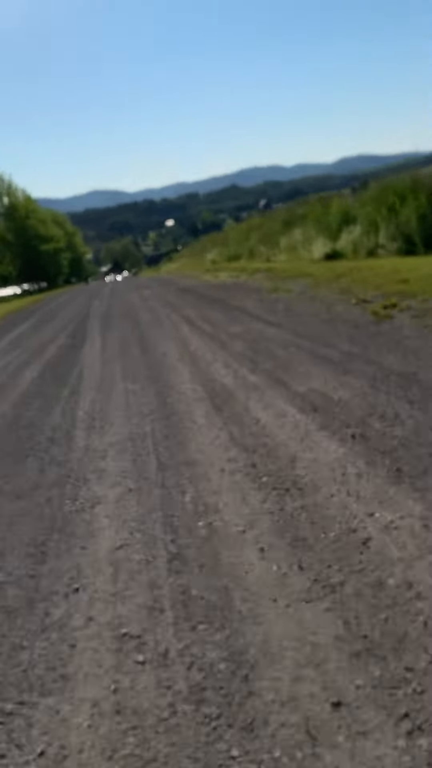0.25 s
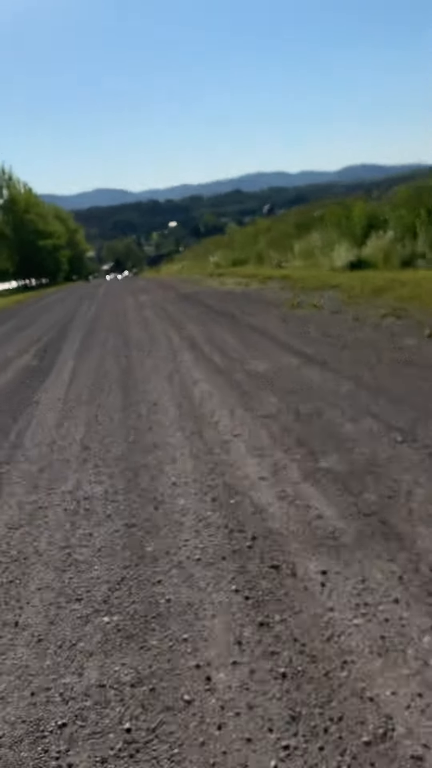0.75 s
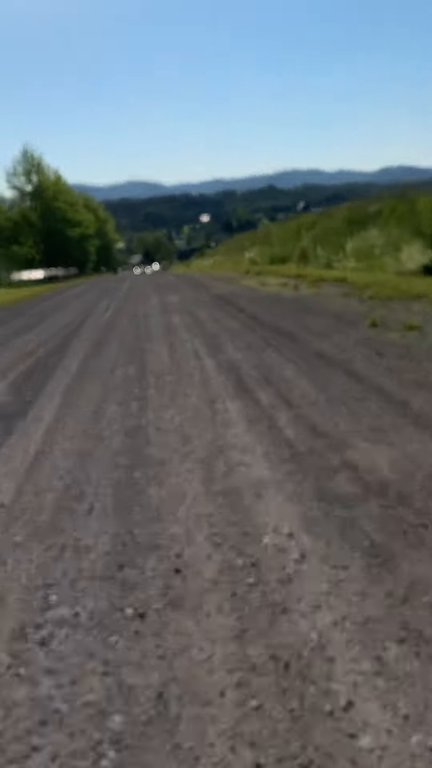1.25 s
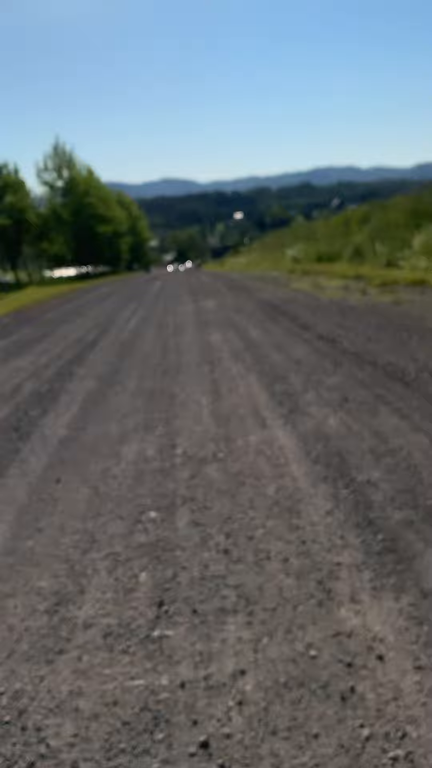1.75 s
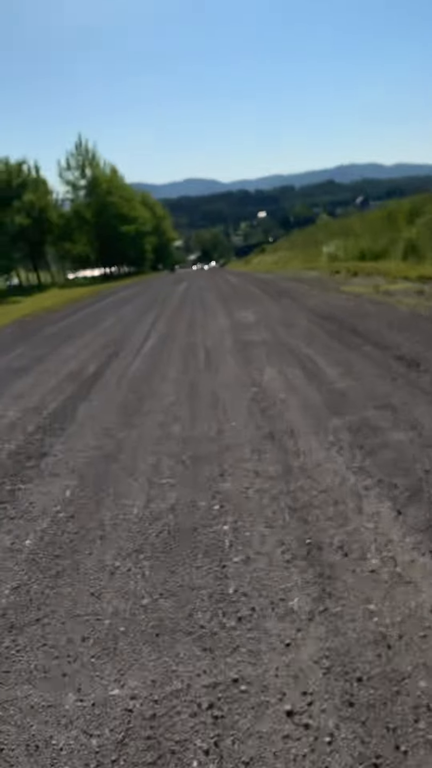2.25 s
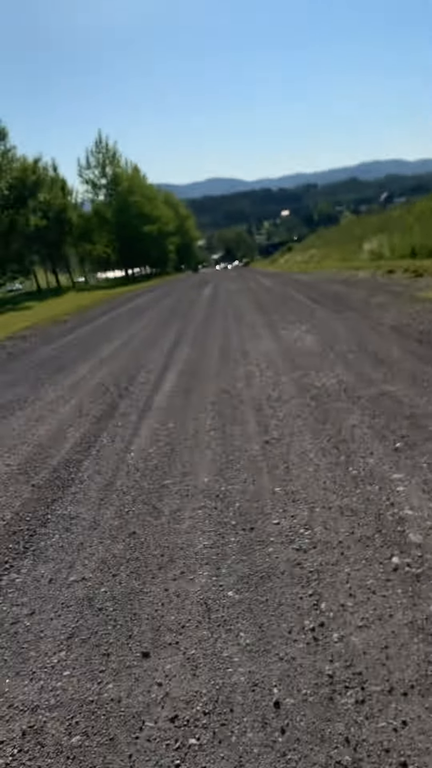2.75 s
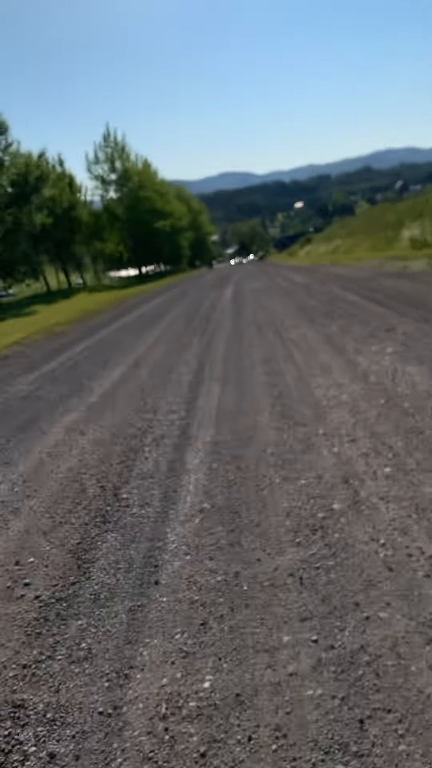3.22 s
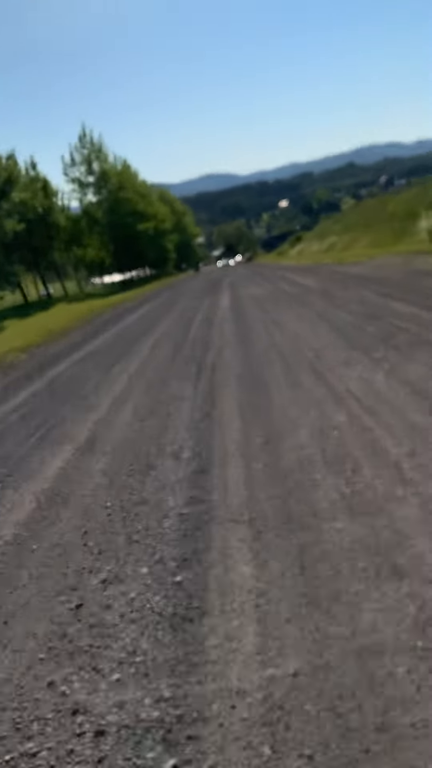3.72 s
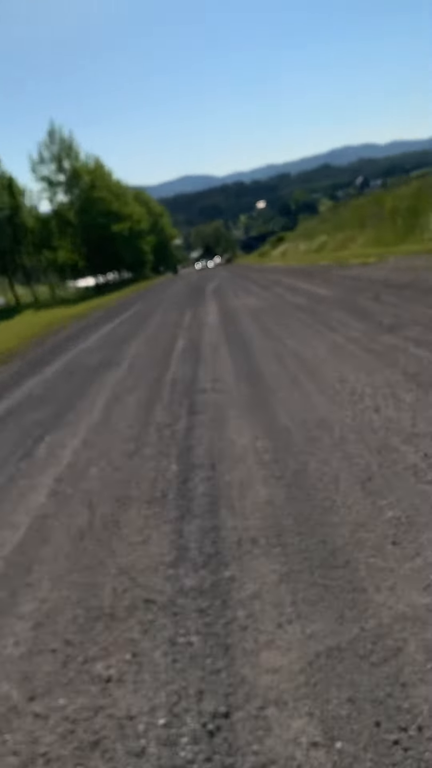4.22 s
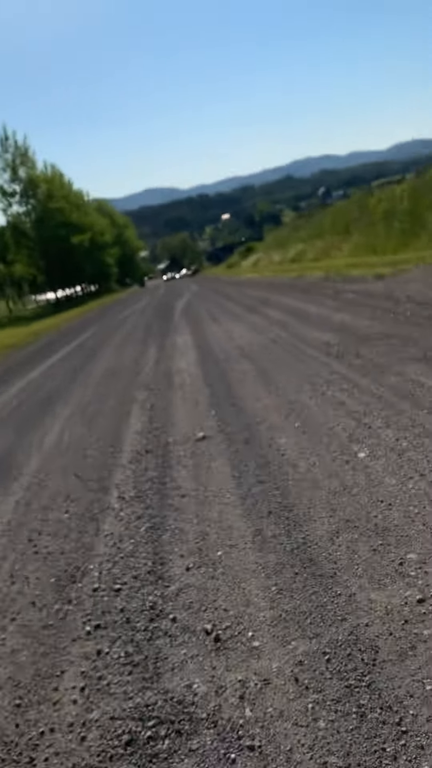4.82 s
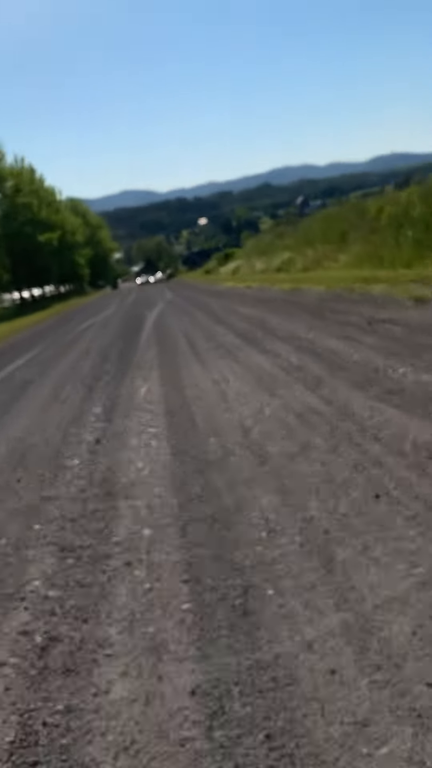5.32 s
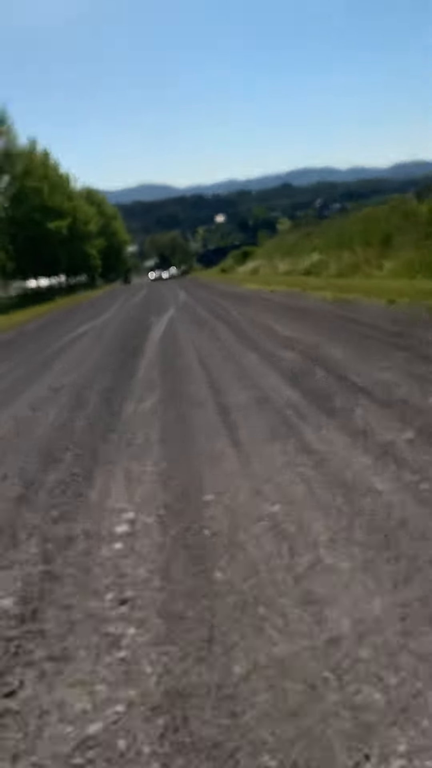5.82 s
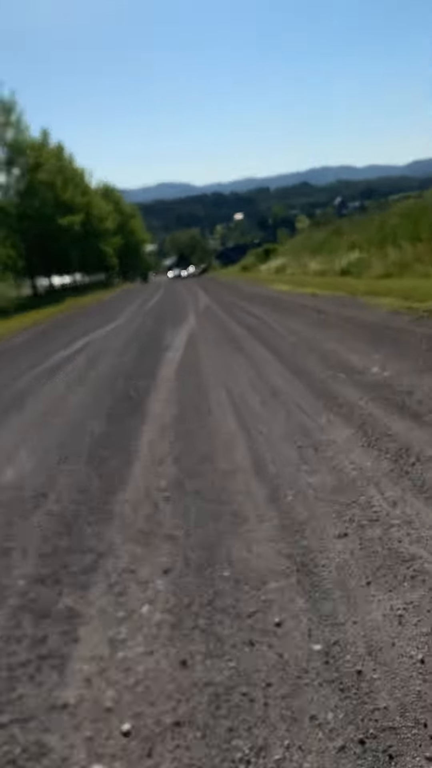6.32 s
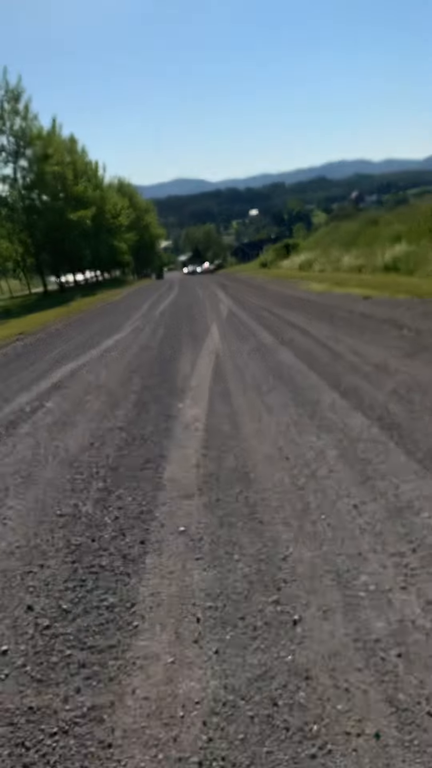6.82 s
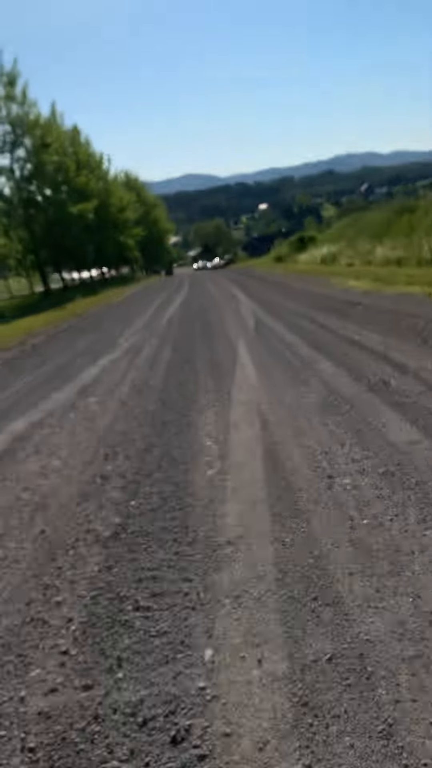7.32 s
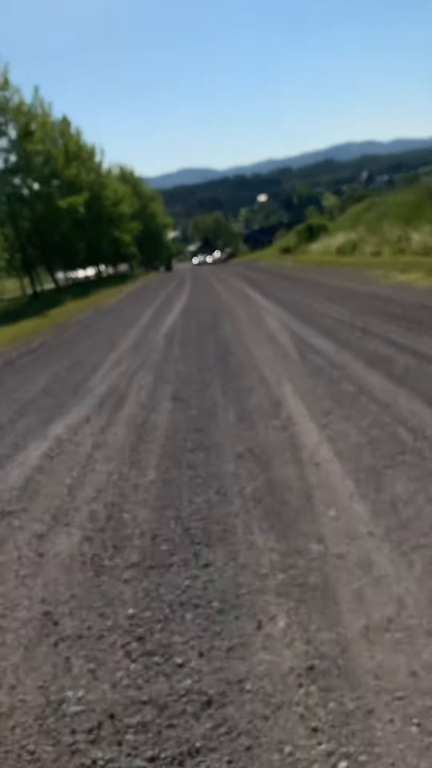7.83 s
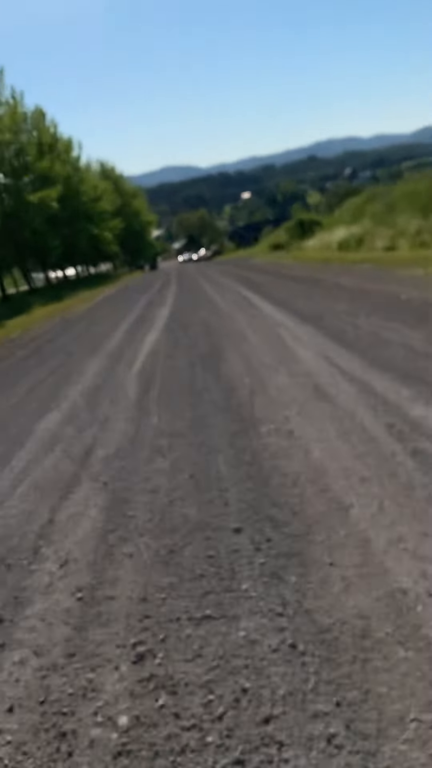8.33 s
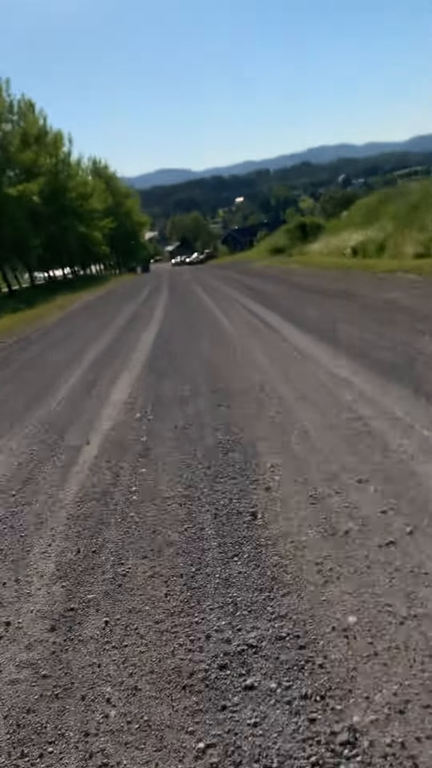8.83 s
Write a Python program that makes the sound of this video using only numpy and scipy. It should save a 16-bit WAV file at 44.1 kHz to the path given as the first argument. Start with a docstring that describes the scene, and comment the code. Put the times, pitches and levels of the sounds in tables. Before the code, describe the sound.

Continuous crunching of tyres on gravel, close and dry in the open air, with pebbles clicking, chips ticking and small stones clinking. The texture is uneven, briefly looser then firmer, and grows fuller as the bike gains speed. Isolated stones crack sharply from under the wheels. Beneath it, wind rumbles on a moving stereo microphone; after seven seconds heavy buffets mix with dull bumps of the tyre.

```python
"""Fine grit grinds under tyres over a low rumble of wind: a bicycle rolls down loose gravel, slowly speeding up.
Tread roar, crunch and fizz are dense random impacts; larger stones snap out with a crack and a hollow thock.
Pebbles, chips, clinks and thuds are short resonances, and turbulent wind is filtered noise with hard buffets.
A pair of microphone ports hears the bass as one and the treble a little apart, by phase shifts."""
import sys
import numpy as np
from scipy import signal
from scipy.fft import rfft, irfft, next_fast_len
from scipy.io import wavfile

SR = 44100
rng = np.random.default_rng(int(sys.argv[2]) if len(sys.argv) > 2 else 0)


def digitize_waveform(pressure):
    """Quantize a signal to 16-bit integers and store it at the path in sys.argv[1].

    Rows of a 2-D input are taken as channels; values are limited to [-1, 1].
    """
    field = np.atleast_2d(pressure).T
    bounded = np.clip(field, -1, 1)
    quanta = np.round(bounded * 32767).astype(np.int16)
    wavfile.write(sys.argv[1], SR, quanta)


N = 399546

# Looser and firmer ground. Each row: time in seconds, depth of loose gravel in dB.
GRAVEL_DEPTH = [(0.0, 4), (0.3, 4.5), (0.62, 10), (0.95, -1), (1.35, 0), (1.53, 0.5), (1.8, 1), (2.1, 5.5),
                (2.52, 0.5), (2.85, 2), (3.25, 1), (3.6, 3.5), (4.1, 4.5), (4.8, 4), (5.45, 5.5),
                (5.9, 5.5), (6.75, 4.5), (7.2, 1.5), (7.48, -4.5), (7.9, 1), (8.15, 6), (9.06, 5)]
# Each tyre layer: dB at the starting speed, dB more per doubling of speed, share of the gravel's depth it follows.
ROAR_LAW, CRUNCH_LAW, FIZZ_LAW = (-47.5, 19, 0.26), (-43, 6.8, 0.37), (-54, 1.3, 0.53)


def tyres():
    """Granular failure: tread roar, crunch and sand fizz surge together as clumps of gravel give way."""
    # Spectra of the three layers. Each row: frequency in Hz, relative level in dB.
    roar_spectrum = [(200, -26), (400, -6.5), (600, 3), (800, -1.5), (1050, 2), (1280, 4), (1480, -1),
                     (2200, -6), (5000, -22)]
    crunch_spectrum = [(700, -30), (1300, -2), (1900, -5), (2600, 0), (2950, -3), (3300, -1), (3650, -3.5),
                       (4000, -2.5), (5000, -5), (6000, -9), (7000, -14), (8500, -22), (10000, -31),
                       (16000, -60)]
    fizz_spectrum = [(3000, -20), (5500, -1), (6500, 0), (8000, 4), (9000, 4), (10200, 1.7), (11000, -2),
                     (15700, -1), (17000, -6)]
    clumps = wander(rate_hz=14.3)
    roar = grit(roar_spectrum, per_s=1800, spread_db=2.5, width_hz=250, count=6)
    crunch = grit(crunch_spectrum, per_s=3600, spread_db=2.5, width_hz=480, count=16)
    fizz = grit(fizz_spectrum, per_s=8000, spread_db=2.1, width_hz=750, count=14)
    roar = roar * level(ROAR_LAW, GRAVEL_DEPTH) * gain_of(2.0 * clumps)
    crunch = crunch * level(CRUNCH_LAW, GRAVEL_DEPTH) * gain_of(1.4 * clumps)
    fizz = fizz * level(FIZZ_LAW, GRAVEL_DEPTH) * gain_of(1.2 * clumps)
    return roar + crunch + fizz


def grit(spectrum, per_s, spread_db, width_hz, count=20):
    """Shot noise: tiny impacts excite one band per grain size, left and right of the wheels."""
    hz = np.fft.rfftfreq(1024, 1 / SR)
    out = np.zeros((2, N))
    for centre_hz in np.linspace(spectrum[0][0], spectrum[-2][0], count):
        bell = np.exp(-.5 * ((hz - centre_hz) / width_hz) ** 2)
        band = gain_of(read(spectrum, hz)) * bell
        clusters = patches()
        for direction in (-1, 1):
            grain = np.fft.fftshift(irfft(band * ports(hz, direction)), 1)
            impacts = clicks(per_s / count, spread_db) * clusters
            out += signal.oaconvolve(np.array([impacts, impacts]), grain, "same", axes=1)
    return evened(out)


def patches():
    """Amplitude modulation: a random gain that gives one size of grain its clusters and lulls."""
    patchy_db, patchy_hz = 1, 25.2
    knots = np.arange(0, N + SR, SR / patchy_hz)
    gains = gain_of(patchy_db * rng.standard_normal(len(knots)))
    return np.interp(np.arange(N), knots, gains)


def stones():
    """Stick and release: each large stone grates briefly as the tread loads it, then snaps free."""
    # Stones flicked by the tread. Each row: time in seconds, peak level in dB, crack in Hz, thock in Hz,
    # thock against the crack in dB, loose grit after it in dB, direction with 0 ahead.
    flicked = [(0.1935, -19, 2650, 804, -14, 1, 0.1), (0.3568, -18.5, 1790, 850, 0, 1, -0.88),
               (0.4356, -18, 3040.0, 900.0, -12, -1, 0.1), (0.66, -24, 2850, 1030, 6, -1, -0.014),
               (0.8139, -11.8, 3300, 1060, -14, -7, 0.064), (0.9165, -19, 2330, 930.0, -18, -4, 0.79),
               (1.0302, -4, 2860, 840.0, -14.5, -24, 0.064), (1.1085, -27, 1840.0, 1050.0, 0, -11.0, 0.1),
               (1.1871, -15.5, 1860, 950, 0.5, -8, -0.6), (1.2288, -15.5, 2250, 950.0, -2, -9, -0.59),
               (1.29, -19, 3430, 900, -20, -3, 0.1), (1.3441, -12.5, 3270, 760.0, -14, -12, 0.25),
               (1.407, -12.5, 2330.0, 930, 0.5, 0, -0.57), (1.623, -27, 2400, 1050, 4, 0, -0.16),
               (1.6551, -18.5, 2420.0, 1090, 3, -1, 0.009), (1.7104, -12.5, 2560, 600.0, -19, -7, -0.83),
               (1.7528, -22.5, 2350.0, 670.0, 14.0, -12, -0.0),
               (1.877, -21, 2980.0, 1050.0, -16, -1.0, 0.1), (1.893, -19, 2460.0, 700.0, -23, -9, 0.4),
               (1.993, -19, 2520, 910, -7, 2, -0.16), (2.095, -17, 2850, 830, -6, -6, -0.56),
               (2.106, -18, 2400, 840, 3, 1, -0.9), (2.1282, -17.5, 3430.0, 1030.0, -2.5, -11, 1),
               (2.298, -20.5, 2340, 900, -16, -5, -0.16), (2.315, -11, 2920, 900, -18, -2, -0.068),
               (2.3645, -23, 2400, 950, -1, -10, -0.21), (2.376, -22, 2630, 900, -20, -6, 0.45),
               (2.5123, -21, 2400.0, 910.0, 0, -6, -0.28), (2.584, -23.5, 2400, 1044, 7, -7, -0.2),
               (2.62, -24.5, 2580, 900, -8, -1, -0.3), (2.7512, -20.5, 1880.0, 930.0, -3, 4, -0.4),
               (2.7601, -22.5, 1940.0, 810.0, 0, 4.0, -0.2), (2.797, -21, 2360.0, 850.0, -3, -15, -0.6),
               (2.9689, -20.5, 2600.0, 970, 10, -10, -0.4), (2.993, -19, 2940, 850, -20, 4, 0.51),
               (2.982, -24, 2390, 900, -19, -4, 0.54), (3.019, -27, 2400, 1018, 13, -12, -0.4),
               (3.0546, -19.5, 2260.0, 880.0, 2, 10, -0.6), (3.3838, -16.5, 2150.0, 684, -8.5, -8, -0.33),
               (3.4005, -21.5, 2830.0, 1030, -2, 4, 0.18), (3.538, -19, 2800, 900, -20, -12, -0.095),
               (3.579, -15, 2440, 900, -15, -7, -0.13), (3.6327, -20, 2370.0, 900.0, -5.5, -2, -0.3),
               (3.9065, -17.5, 2520.0, 1030, 2, -6, -0.49), (3.9247, -12.5, 3100, 670.0, -20, -5, -0.2),
               (4.3303, -23.5, 2860.0, 960.0, 0, 9, -0.2), (4.758, -17.5, 2880.0, 603, -9.5, 0, 0.053),
               (4.843, -19, 3430.0, 1070, -2, 0, -0.064), (4.9623, -19, 3240.0, 960, 1, 14, 0.093),
               (5.0182, -20.1, 2780.0, 820.0, -22, -2, -0.1), (5.0438, -20, 2330.0, 840.0, -4, 0, -0.23),
               (5.1537, -14, 2980, 920.0, -14, -5, -0.088), (5.3019, -16.5, 3160.0, 870.0, -22, -3, 0.21),
               (5.3954, -18, 3400.0, 790.0, -13, -2, 0.24), (5.4604, -16.5, 3100, 980.0, -19, -3, -0.039),
               (5.688, -24, 2650, 900, -16, -8, -0.093), (5.816, -18.5, 3340.0, 980.0, -6, -3, 0.026),
               (5.8508, -19.5, 3040.0, 900.0, -20, 5, -0.28), (5.9869, -19.5, 2350.0, 935, 1, -5, -0.71),
               (5.999, -16, 3100, 900, -13, -3, 0.1), (6.088, -23, 3120.0, 1050.0, -5, 13, -0.022),
               (6.1604, -18, 2770.0, 930.0, 6, 9, -0.57), (6.274, -16.5, 2720, 960.0, -2.0, -3, -0.45),
               (6.3547, -18, 2270.0, 920.0, -0.0, -3, -0.53), (6.5907, -13.5, 2270, 820, 4.5, 8, -0.72),
               (6.7506, -13.5, 2930.0, 920, 7, -7, -0.67), (6.767, -17, 2570, 930.0, -27, 3, 0.42),
               (6.7905, -15, 2060, 730.0, -8, -4, -0.84), (6.8303, -8, 2400, 830, -1, -18, 0.54),
               (6.8956, -23, 2080.0, 980.0, -20, 3, -1.2), (7.083, -35, 2820, 900, -18, -6, 0.01),
               (7.1835, -22.5, 2530, 985, 0, -4, -0.5), (7.3104, -15, 3000, 970.0, -15, -3.5, -0.29),
               (7.364, -12, 2120, 670.0, -9, -2, -0.25), (7.3971, -18.5, 2180, 820.0, 3, -9, -0.21),
               (7.497, -22, 2400, 968, 17, -8, -0.3), (7.5467, -21.2, 2150.0, 820, -1, -4, -0.3),
               (7.638, -17.5, 2300, 755, 0, 1, -0.3), (7.7406, -6.5, 3350, 820.0, -14.5, -19, -0.27),
               (7.805, -18, 2700, 900, -7, -8, 0.12), (7.837, -19.5, 2440.0, 840.0, -1, 4, -0.6),
               (8.0396, -1.5, 3020, 880, -4, -24, 0.48), (8.1195, -18, 2110.0, 850.0, 1, -5, -0.53),
               (8.131, -17, 2290, 927, 2, -3, -0.5), (8.170, -14.5, 2880, 800.0, -5.5, -8, 0.58),
               (8.214, -14.5, 2160.0, 755, -6, -9, -0.52), (8.3046, -22, 2850.0, 990.0, 12.0, -10, -0.18),
               (8.4255, -19, 2700, 1080, 1, 2.0, -0.18), (8.537, -19, 2900, 900, -7, -8, 0.6),
               (8.641, -18, 2400, 900, -4, -9, -0.3), (8.6559, -14, 2470, 935, -6, -12, -0.066),
               (8.891, -17, 2540.0, 900.0, -0.5, -12, -0.2), (8.9245, -21, 2800.0, 990.0, 14, -9.0, -0.2),
               (8.9804, -17, 2730.0, 1030.0, 4, 5.0, -0.1), (9.026, -19.5, 2300, 950, 6, -7, 0.1)]
    grate_db = -17  # peak of the grating against that of the snap
    out = np.zeros((2, N))
    for s, peak_db, crack_hz, thock_hz, thock_db, loose_db, direction in flicked:
        grating = stone(crack_hz, thock_hz, thock_db, 12, direction)
        add(out, s - .01, gain_of(peak_db + grate_db) * grating)
        snap = stone(crack_hz, thock_hz, thock_db, loose_db, direction)
        add(out, s - .005, gain_of(peak_db) * snap)
    return out


def stone(crack_hz, thock_hz, thock_db, loose_db, direction, size=2048):
    """Dispersion: later low frequencies sweep one snap, 5 ms in, from its crack down to its thock."""
    sweep_s, sweep_hz = .006, 1000  # extra delay of the lowest bass, frequency where it has halved
    loose_s = 0.0096  # decay time of the neighbouring grit
    hz, t = np.fft.rfftfreq(size, 1 / SR), np.arange(size) / SR
    crack = hump(hz, crack_hz, .42) + .25 * hump(hz, 2 * crack_hz, .4)
    # The glide fills the gap between crack and thock.
    glide = .4 * gain_of(thock_db / 2) * hump(hz, np.sqrt(crack_hz * thock_hz), .3)
    thock = gain_of(thock_db) * hump(hz, thock_hz, octaves=0.39)
    delay = .005 + sweep_s / (1 + (hz / sweep_hz) ** 2.8)
    # Phase is the integral of group delay over frequency.
    dispersion = np.exp(-2j * np.pi * np.cumsum(delay) * hz[1])
    snap = irfft((crack + glide + thock) * dispersion * ports(hz, direction))
    # Neighbouring grit shifts after it.
    scatter = rng.standard_normal(size) * np.exp(-t / loose_s)
    scatter = scatter / np.linalg.norm(scatter)
    loose = signal.fftconvolve(snap, scatter[None], axes=1)[:, :size]
    snap = snap + gain_of(loose_db) * loose
    return snap / abs(snap).max()


def pebbles(count=24):
    """Random superposition: small stones of many pitches snap and crumble in clusters."""
    pebble_hz, pebble_db = 2780, -6.5  # reference crack pitch, level against stone_level
    out = np.zeros((2, N))
    for direction in np.linspace(-1.7, 1.7, count):
        crack_hz = pebble_hz * 2 ** rng.uniform(-.4, .6)
        thock_hz, thock_db = rng.uniform(650, 1200), rng.uniform(-10, 2)
        snap = stone(crack_hz, thock_hz, thock_db, rng.uniform(-9, 3), direction)
        impacts = clicks(per_s=2, spread_db=2.3)
        out += signal.oaconvolve(impacts[None], snap, axes=1)[:, :N]
    clusters = gain_of(2 * wander(rate_hz=12))
    return gain_of(pebble_db) * evened(out * clusters) * stone_level()


def stone_level():
    """Geometric mean: small stones are stirred halfway in dB between the tread's roar and the crunch."""
    return np.sqrt(level(ROAR_LAW, GRAVEL_DEPTH) * level(CRUNCH_LAW, GRAVEL_DEPTH))


def chips(count=24):
    """Brief contact excites the treble: loud chips of grit, with faint stray ones ticking between."""
    # Grit clicking together. Each row: time in seconds, nominal level in dB, centre frequency in Hz.
    loud_chips = [(0.209, -31, 5870), (0.6054, -29, 5970), (0.6595, -28, 6000), (0.6783, -29, 7400),
                  (1.219, -33, 10000), (1.3885, -40, 11500), (1.417, -32, 11000), (1.443, -27, 7210),
                  (1.6811, -29, 15000), (2.0475, -30, 5800), (2.1168, -33, 7500), (2.1285, -37, 5900),
                  (2.3125, -34, 13000), (2.3515, -38, 11500), (2.3755, -35, 12000), (2.6835, -33, 5600),
                  (2.7355, -35, 11000), (2.78, -31, 5800), (2.8085, -34, 14500), (2.8235, -27, 5620),
                  (2.9915, -30, 14000), (3.0035, -36, 12000), (3.1562, -22.5, 5500), (3.3035, -36, 11500),
                  (3.506, -31, 5400), (3.6152, -35, 9000), (3.7404, -25, 5400), (3.8325, -32, 6000),
                  (3.9075, -34, 13000), (4.0435, -33, 7200), (4.3045, -32, 7500), (4.5185, -28, 12500),
                  (4.7115, -32, 5900), (4.7574, -27, 5810), (4.8424, -27, 5840), (5.139, -26, 4600),
                  (5.4075, -36, 14500), (5.8985, -36, 6000), (5.9655, -34, 6000), (5.998, -31, 5200),
                  (6.1385, -30, 5900), (6.1459, -26, 6000), (6.272, -39, 5500), (6.3082, -32, 6000),
                  (6.4285, -35, 12000), (6.5787, -28, 7410), (6.762, -20, 14000), (6.8215, -30, 13000),
                  (6.8286, -20.5, 5500), (6.8955, -34, 12000), (6.9052, -28, 6000), (7.31, -28, 5910),
                  (7.7402, -36, 14000), (7.8315, -37, 12500), (8.0397, -18, 6560), (8.111, -29, 5730),
                  (8.1405, -35, 13000), (8.2025, -36, 12500), (8.2485, -35, 5800), (8.643, -33, 8500),
                  (8.6774, -30, 11500), (8.773, -32, 6090), (8.8275, -40, 13000), (8.852, -32, 6000),
                  (8.924, -33, 6090)]
    ticks_db = -7  # stray chips against the sand fizz
    out, stray = np.zeros((2, N)), np.zeros((2, N))
    for s, chip_db, chip_hz in loud_chips:
        add(out, s - .001, gain_of(chip_db) * chip(chip_hz))
    for chip_hz in np.geomspace(4500, 13000, count):
        # Higher, smaller chips strike more weakly.
        impacts = clicks(per_s=2, spread_db=1.2) * 6000 / chip_hz
        stray += signal.oaconvolve(impacts[None], chip(chip_hz), axes=1)[:, :N]
    return out + gain_of(ticks_db) * evened(stray) * level(FIZZ_LAW, GRAVEL_DEPTH)


def chip(chip_hz, size=1024):
    """Band-passed noise burst: a bright, very short scrape of stone on stone, 1.5 ms in."""
    chip_s, chip_octaves = 0.00059, 0.53
    tail_db, tail_s = -26, 0.0061  # dust scattered by the chip
    hz, t = np.fft.rfftfreq(size, 1 / SR), np.arange(size) / SR
    envelope = np.exp(-(t / chip_s) ** 2) + gain_of(tail_db) * np.exp(-t / tail_s)
    burst = np.roll(rng.standard_normal(size) * envelope, size // 16)
    colour = evened(hump(hz, chip_hz, chip_octaves)) * ports(hz, rng.uniform(-0.23, 1))
    return irfft(rfft(burst) * colour)


def clinks(count=40, size=2048):
    """Damped modes: stones that roll clear knock together and ring briefly, each at its own pitch."""
    clink_db, clink_cycles = -3, 44  # level against stone_level, cycles for a fall to 1/e
    out, t = np.zeros((2, N)), np.arange(size) / SR
    for hz in np.geomspace(760, 4000, count) * rng.uniform(1.0, 1.03, count):
        onset = 1 - np.exp(-t / .001)
        ring = np.exp(-hz * t / clink_cycles + 2j * np.pi * hz * t) * onset
        ring = (ports(hz, rng.uniform(-2.9, 2.43))[:, None] * ring).real
        impacts = clicks(per_s=3, spread_db=1.5)
        out += signal.oaconvolve(impacts[None], ring, axes=1)[:, :N]
    return gain_of(clink_db) * evened(out) * stone_level()


def thuds(size=2048):
    """Damped impulse response: the air-filled tyre answers a lump with a few dull cycles."""
    # Lumps in the road. Each row: start in seconds, envelope peak in dB, frequency in Hz.
    lumps = [(0.358, -24.5, 590), (1.349, -27, 407), (1.412, -18, 366), (1.755, -19, 447),
             (2.484, -21, 284), (2.665, -23, 415), (2.874, -27, 434), (3.35, -21, 415), (3.615, -23, 370),
             (4.123, -18.5, 288), (4.779, -25, 460), (4.969, -25.5, 460), (5.649, -24, 370),
             (6.299, -22, 340), (6.594, -22, 458), (6.692, -23, 406), (6.756, -17.5, 307),
             (6.835, -19, 420), (7.387, -23, 364), (7.395, -12.5, 249), (7.430, -22, 362), (7.52, -23, 318),
             (7.902, -20, 334), (8.04, -24, 606), (8.227, -20, 378), (8.266, -18.5, 320), (8.325, -17, 343),
             (8.44, -15, 287), (8.515, -18.5, 403), (8.783, -23, 428), (8.835, -20, 385), (8.861, -24, 413),
             (9.035, -19.5, 405)]
    rise_s = 0.0014
    out, t = np.zeros((2, N)), np.arange(size) / SR
    for s, peak_db, hz in lumps:
        u = t / rise_s
        thud = u * np.exp(1 - u) * np.sin(2 * np.pi * hz * t)
        add(out, s, gain_of(peak_db) * thud[None])
    return out


def wind():
    """Turbulence noise: eddies at the microphone make a deep rumble and a lumpier flutter above it."""
    # Spectra of the two layers. Each row: frequency in Hz, relative level in dB.
    rumble_spectrum = [(15, -48), (30, -19), (45, -3.5), (65, 1), (90, -2), (130, -7.5), (190, -12),
                       (300, -31), (600, -51), (2000, -88)]
    flutter_spectrum = [(60, -31), (150, 6), (220, 2), (370, 1.5), (480, -5), (800, -9.5), (1500, -48),
                        (4000, -96)]
    # The breeze, on top of the headwind from riding. Each row: time in seconds, gust in dB.
    breeze = [(0.0, 1.5), (0.25, -3), (0.8, 1), (1.1, -0.5), (1.4, -0.5), (1.75, 2), (2.1, -1.5), (2.6, 1),
              (3.0, 1), (3.27, -1.5), (3.56, 2), (3.9, 2.5), (4.35, 0), (4.62, 1.5), (5.05, 1), (5.42, -2),
              (5.75, -0.3), (6.5, 0.7), (7.05, -1), (7.6, 1), (8.25, 1.5), (8.6, 0.3), (9.06, 3)]
    # Each layer: dB at the starting speed, dB more per doubling of speed, share of the gusts it follows.
    rumble_law, flutter_law = (-33, 13.6, 1.55), (-40, 11.1, 1)
    eddies = wander(rate_hz=17.7)
    rumble = evened(coloured(rng.standard_normal(N), rumble_spectrum) * gain_of(1.45 * eddies))
    flutter = evened(coloured(rng.standard_normal(N), flutter_spectrum) * gain_of(2.23 * eddies))
    return rumble * level(rumble_law, breeze) + flutter * level(flutter_law, breeze)


def buffets(size=4096):
    """Pressure transients: single hard eddies shove the diaphragm for a few cycles."""
    # Hard buffets of air. Each row: time of the envelope peak in seconds, its level in dB, frequency in Hz.
    hard_eddies = [(0.055, -27, 82), (0.527, -24, 81), (0.784, -23.5, 73), (1.541, -18, 68),
                   (1.690, -23, 66), (1.711, -26.5, 187), (1.813, -14, 79), (2.584, -23, 74),
                   (2.94, -17.5, 105), (3.099, -17.5, 92), (3.556, -20, 68), (3.619, -23.5, 200),
                   (4.594, -17, 84), (4.553, -24, 197), (5.019, -27, 174), (5.221, -23, 65),
                   (6.327, -20, 74), (6.721, -26, 205), (6.882, -18, 90), (7.33, -13.5, 70.5),
                   (7.392, -10.5, 193), (7.428, -11, 74.4), (7.766, -21, 180), (7.794, -12.5, 114.5),
                   (8.265, -19, 73.5), (8.444, -12.5, 114), (8.665, -20.5, 184), (8.87, -12.5, 153)]
    rise_s = 0.00586
    out, t = np.zeros((2, N)), np.arange(size) / SR
    for s, peak_db, hz in hard_eddies:
        u = t / rise_s
        shove = u * np.exp(1 - u) * np.sin(2 * np.pi * (hz * t + rng.random()))
        add(out, s - rise_s, gain_of(peak_db) * shove[None])
    return out


def ports(hz, direction):
    """Interaural-style phase difference: what two ports make of sound from one direction."""
    # Each row: frequency in Hz, phase by which left leads in radians.
    port_phase = [(0, 0), (1000, 0), (1300, -.7), (1500, -3.3), (1800, -3.8), (2200, -5.7), (3000, -4.8),
                  (4000, -4.2), (4700, -3.14), (6850, 0), (9000, 3.14), (11100, 6.28), (13100, 9.42),
                  (15300, 12.57)]
    # Each row: frequency in Hz, change of that phase per unit of direction in radians.
    port_spread = [(0, 0), (850, 0), (1350, 1.35), (2200, 1.2), (3200, .85), (4300, .48), (16000, .48)]
    phase = read(port_phase, hz) + direction * read(port_spread, hz)
    return np.exp(.5j * np.array([phase, -phase]))


def hump(hz, centre_hz, octaves):
    """Broad resonance: a bell on a log-frequency axis whose impulse has about unit height."""
    shape = np.exp(-.5 * (np.log2((hz + 1) / centre_hz) / octaves) ** 2)
    return shape / shape.mean()


def clicks(per_s, spread_db):
    """Poisson-like impacts of either sign: exponentially spread decibels give many small, few large."""
    when, size, sign = rng.random((int(per_s * N / SR) + 1, 3)).T
    size_db = spread_db * np.minimum(-np.log1p(-size), 4.5)
    return np.bincount((when * N).astype(int), gain_of(size_db) * np.sign(sign - .5), N)


def wander(rate_hz):
    """Low-passed noise: a smooth random curve of rms 1 that moves up to about the given rate."""
    smoother = signal.butter(2, rate_hz, fs=SR, output="sos")
    return evened(signal.sosfilt(smoother, rng.standard_normal(N)))


def coloured(x, spectrum):
    """Linear filtering: multiplies the sound's spectrum by a gain curve."""
    size = next_fast_len(N)
    gains = gain_of(read(spectrum, np.fft.rfftfreq(size, 1 / SR)))
    return irfft(rfft(x, size) * gains, size)[..., :N]


def level(law, curve):
    """Power law of speed: gain per sample, growing with speed and following a share of a slow curve."""
    start_db, doubling_db, share = law
    # Speed rises evenly, relative to the starting speed.
    speed = np.linspace(1, 1.391, N)
    curve_db = np.interp(np.arange(N) / SR, *np.transpose(curve))
    return gain_of(start_db + doubling_db * np.log2(speed) + share * curve_db)


def read(points, hz):
    """Logarithmic interpolation: reads a curve on a log-frequency axis."""
    f, value = np.transpose(points)
    return np.interp(np.log(hz + 1), np.log(f + 1), value)


def gain_of(db):
    """Decibel law: level to amplitude gain."""
    return 10 ** (np.asarray(db) / 20)


def evened(x):
    """Power normalisation: scales to rms 1."""
    return x / np.sqrt(np.mean(x ** 2) + 1e-20)


def add(mix, s, sound):
    """Superposition: mixes a sound in at time s."""
    part = mix[:, max(round(s * SR), 0):][:, :sound.shape[1]]
    part += sound[:, :part.shape[1]]


def scene():
    """Superposition of gravel under the tyres and wind on top."""
    gravel = tyres() + stones() + pebbles() + chips() + clinks() + thuds()
    return gravel + wind() + buffets()


def record(dry):
    """Band limiting: a steep low-pass filter at 15900 Hz."""
    lowpass = signal.firwin(511, 15900, window=("kaiser", 9), fs=SR)
    return signal.oaconvolve(dry, lowpass[None], "same", axes=1)


dry = scene()
out = record(dry)
digitize_waveform(out)
```